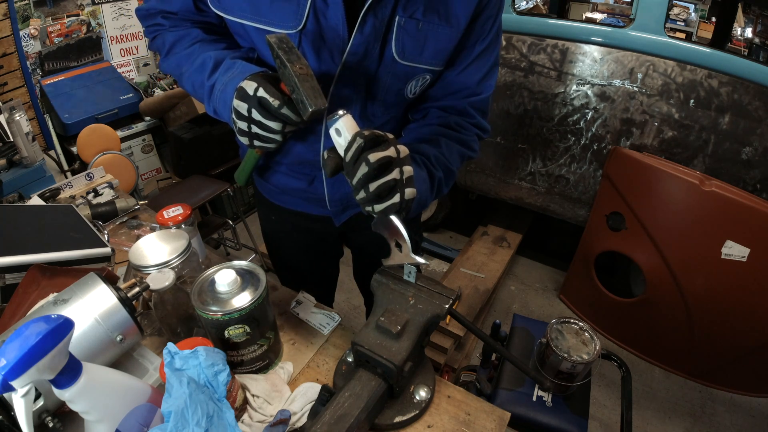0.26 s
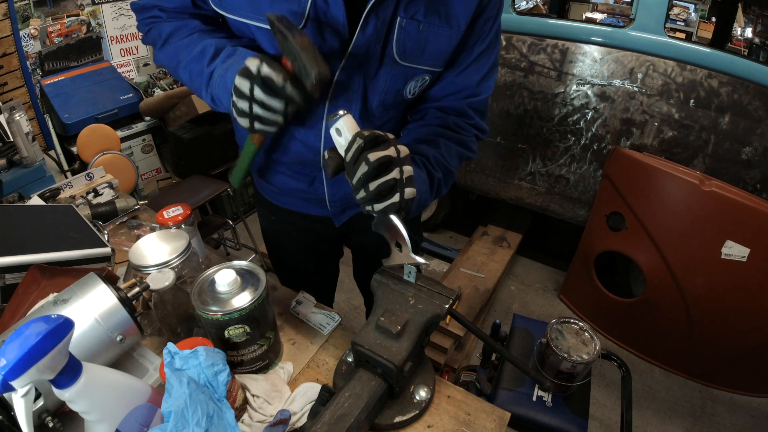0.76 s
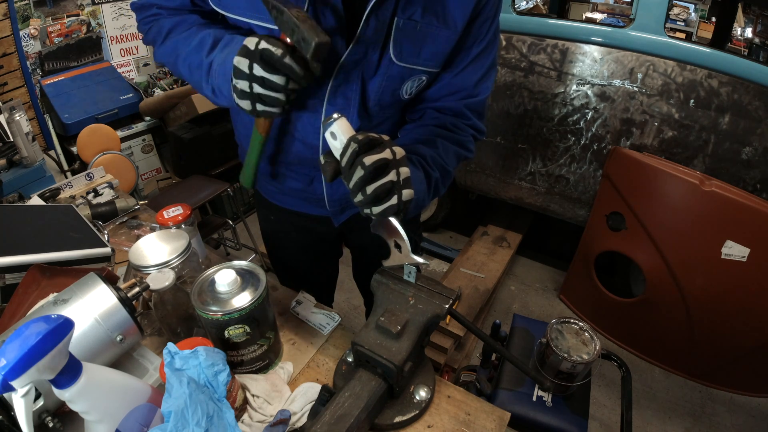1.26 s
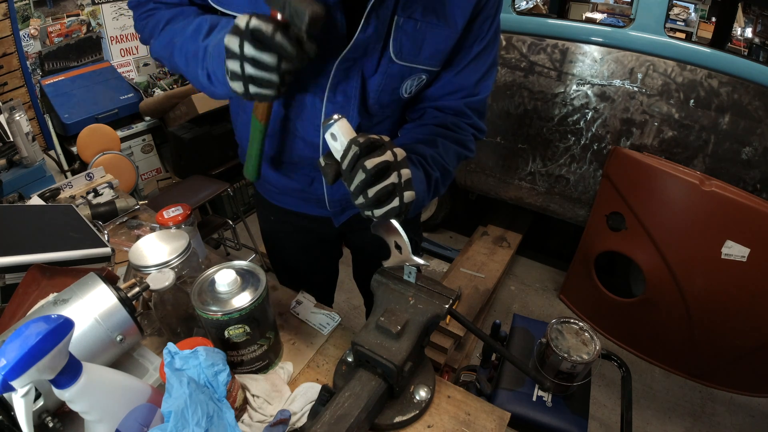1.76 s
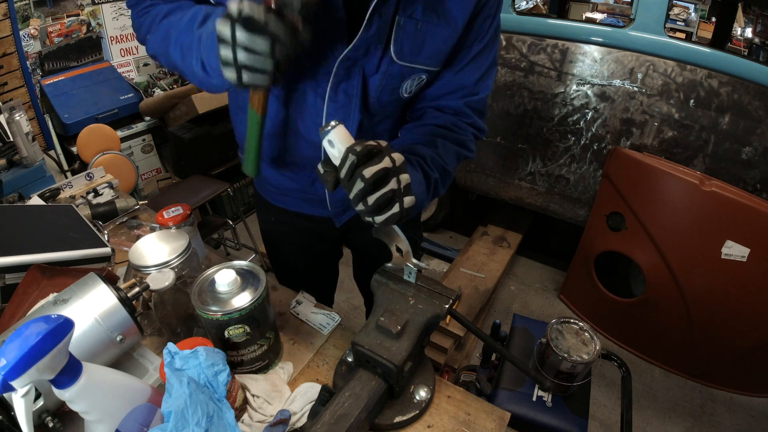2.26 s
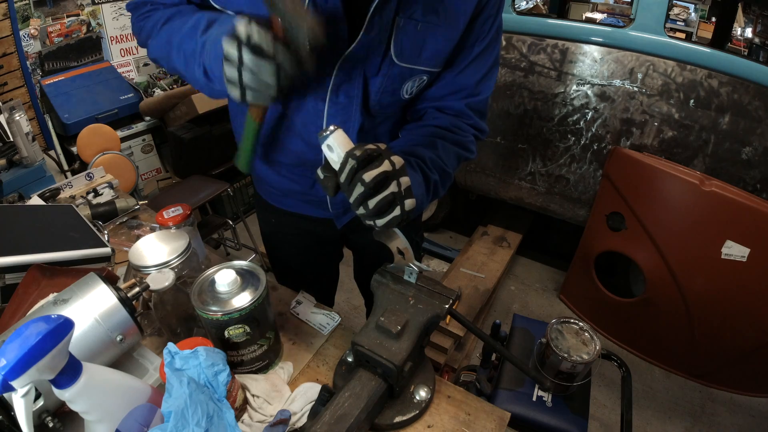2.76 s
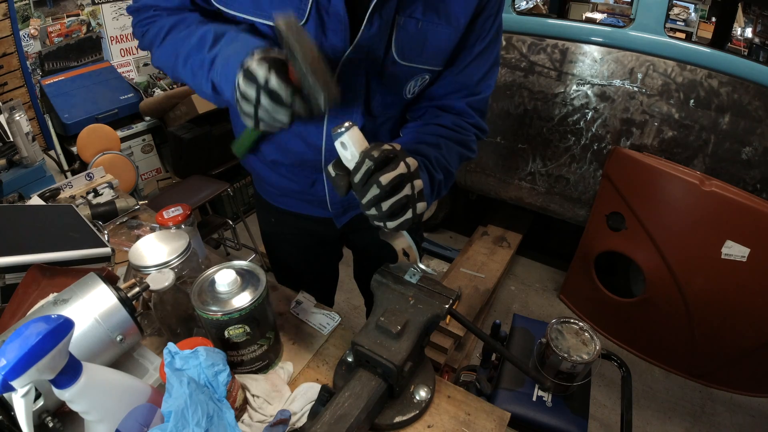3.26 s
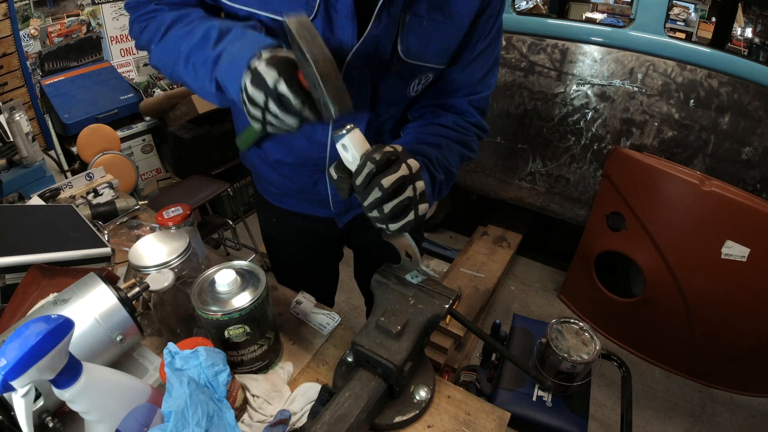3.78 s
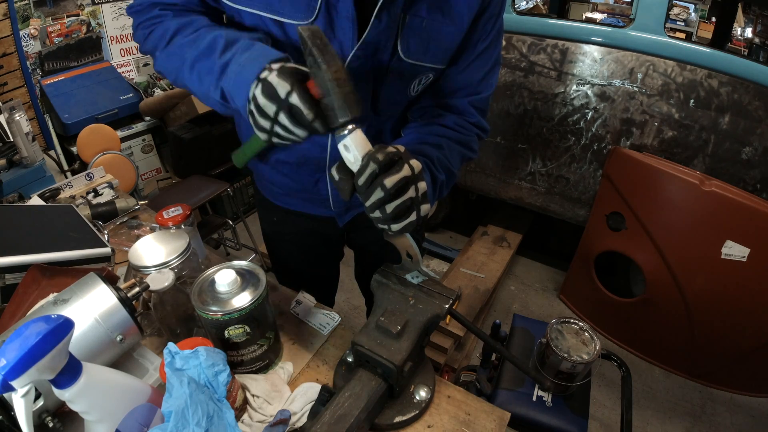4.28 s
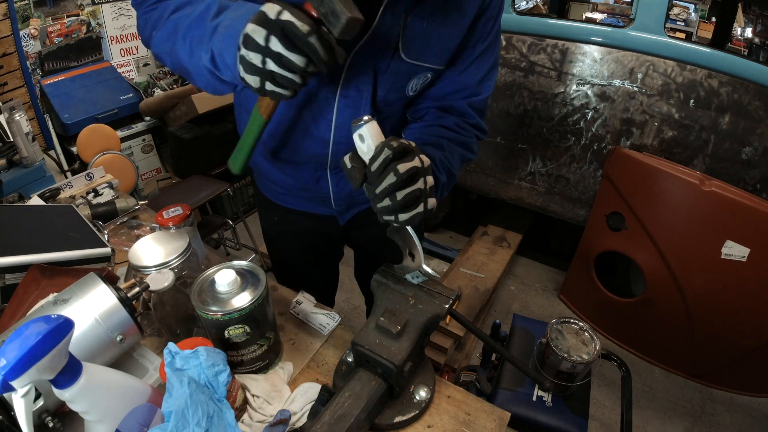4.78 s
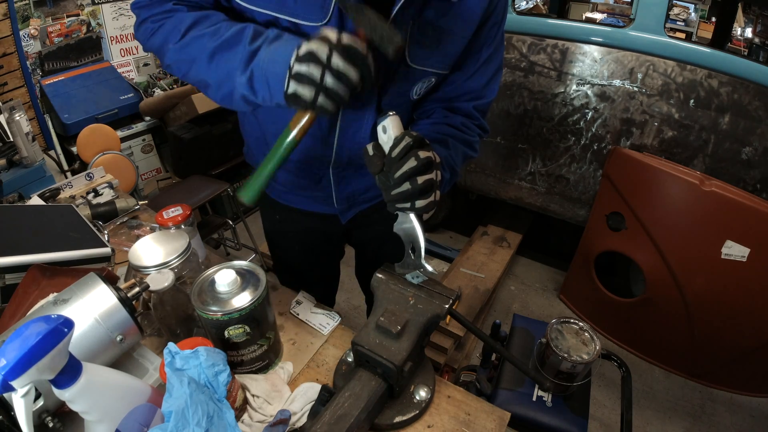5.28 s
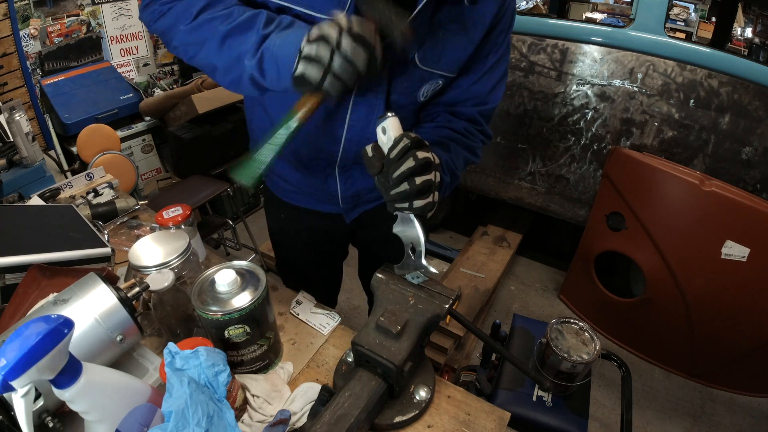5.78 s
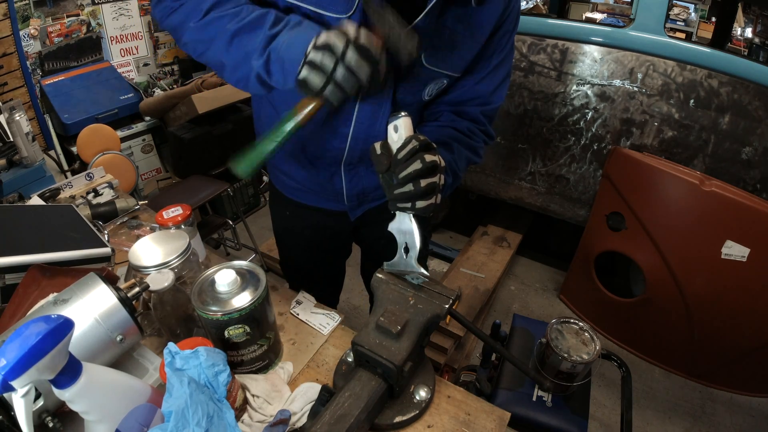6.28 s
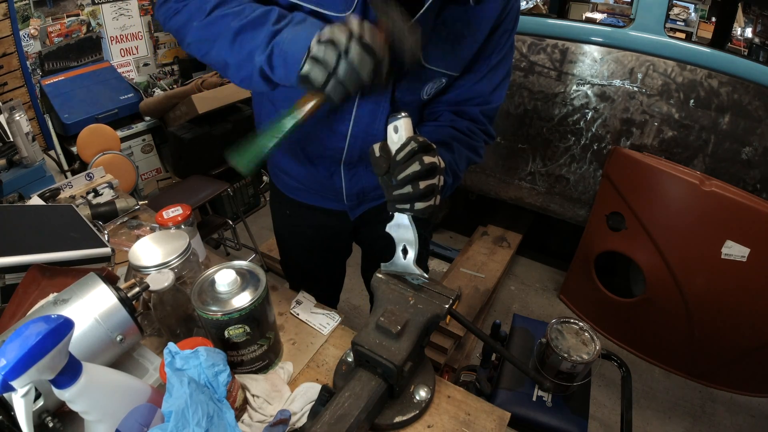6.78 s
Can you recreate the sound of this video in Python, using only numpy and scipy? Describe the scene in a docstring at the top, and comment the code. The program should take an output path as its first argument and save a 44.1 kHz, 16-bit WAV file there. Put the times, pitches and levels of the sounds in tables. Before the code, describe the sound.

Close, sharp hammer-on-chisel clanks, about four a second, booming through a bench, broken by a short metallic rattle before a lighter, looser final burst.

```python
"""Light taps of steel on steel over faint room air seat a chisel; then a hammer drives it into clamped sheet metal.
Each blow is a dead steel clank of damped modes with a tearing edge of noise, heard close up.
Then the bench booms and rings, and the workshop answers with noise that dies band by band.
Part way, loose metal clatters in runs of tiny strikes; the hammering resumes with the chisel broken through."""
import sys
import numpy as np
from scipy import signal
from scipy.fft import rfft, irfft
from scipy.io import wavfile

SR = 44100
rng = np.random.default_rng(int(sys.argv[2]) if len(sys.argv) > 2 else 0)


def transcribe(signal):
    """Save signal, clipped to [-1, 1], as a 16-bit WAV file at the path in sys.argv[1]."""
    frames = np.atleast_2d(signal).T
    limited = np.clip(frames, -1, 1)
    pcm = np.round(limited * 32767).astype(np.int16)
    wavfile.write(sys.argv[1], SR, pcm)


N = 310464
SIZE = 32768  # samples in one sound event
T = np.arange(SIZE) / SR
HZ = np.fft.rfftfreq(SIZE, 1 / SR)

# Long rings of bench and vise. Each row: frequency in Hz, level in dB, t60 in seconds,
# change in dB once the chisel has broken through.
BENCH_RINGS = [(87.15, -39.5, 0.54, -1.5), (94, -45.5, 1.3, -3), (119.1, -35.5, 0.45, 0),
               (151.2, -34, .22, 5), (198.3, -24, 0.15, 5), (230.8, -19.5, 0.16, -1),
               (230.2, -46.5, 1.3, -0.5), (276, -34.5, 0.54, 0), (349.7, -27.5, .3, -5),
               (345, -46.5, 1.2, 2.5), (392, -45, 0.8, -3), (449.5, -45, 0.97, -4), (503, -38, 0.42, -16),
               (628, -38.5, 0.2, 9), (734, -35.5, 0.21, 3.5), (797, -39, 0.16, 13), (910, -46.5, 0.59, -1),
               (1030, -39, 0.095, 0), (1186, -33, 0.24, 2.5), (1375, -44, 0.2, 4), (1637, -38, .22, -0.5),
               (1846, -37.5, 0.21, 4), (2840, -42, 0.17, -4), (3910, -47.5, 0.12, 0),
               (2590, -38.5, 0.23, -4), (3180, -45.5, 0.2, 7.5)]


def amp(db):
    """Decibels as an amplitude factor."""
    return 10 ** (np.asarray(db) / 20)


def read(points, hz=HZ):
    """A curve of (Hz, value) points joined by straight lines over log frequency."""
    f, value = np.transpose(points)
    return np.interp(np.log(hz + 1), np.log(f + 1), value)


def add(mix, start_s, sound):
    """Lay a sound into the mix, cut off at the end of the scene."""
    part = mix[:, round(start_s * SR):][:, :SIZE]
    part += sound[..., :part.shape[1]]


def colour(x, points):
    """Causal minimum-phase filter with the given (Hz, dB) shape."""
    log_gain = np.log(amp(read(points)))
    both_sides = np.concatenate([log_gain, log_gain[-2:0:-1]])
    response = np.exp(np.conj(signal.hilbert(both_sides)))[:len(HZ)]
    return irfft(rfft(x) * response)


def unit(x):
    """Scale to a total energy of one."""
    return x / np.sqrt(np.sum(x ** 2) + 1e-20)


def convolve(a, b):
    """Circular convolution of two sounds of the same length."""
    return irfft(rfft(a) * rfft(b))


def pair(length):
    """White noise at two closely spaced microphone ports: alike in the bass, mostly unrelated in the treble."""
    # Each row: frequency in Hz, left-right likeness from 0 to 1.
    likeness = [(100, 0.94), (400, 0.96), (1000, 0.96), (2700, 0.11), (3400, 0.45), (4200, 0),
                (16000, 0.075)]
    alike = np.clip(read(likeness, np.fft.rfftfreq(length, 1 / SR)), -1, 1)
    mid, side = rfft(rng.standard_normal((2, length)))
    common = np.sqrt((1 + alike) / 2) * mid
    opposed = np.sqrt((1 - alike) / 2) * np.array([side, -side])
    return irfft(common + opposed, length)


def ring(modes, pitch, lag, uneven_db, apart_hz=4500):
    """Damped modes at both ports; each strike starts them at slightly uneven times and levels."""
    hz, width, db = np.transpose(modes)[:, :, None]
    t = np.maximum(T[:SIZE // 8] - lag * rng.random(hz.shape), 0)
    uneven = uneven_db * rng.standard_normal(hz.shape)
    height = amp(db + uneven) * 2 * np.pi * width / SR  # the level is that of the spectral peak
    skew = hz / apart_hz * rng.standard_normal(hz.shape) / 2  # short waves reach the ports out of step
    envelope = height * np.exp(-np.pi * width * t) * (1 - np.exp(-4 * hz * t))
    phase = 2 * np.pi * hz * pitch * t
    sound = (envelope * np.cos(phase + np.array([skew, -skew]))).sum(1)
    return np.pad(sound, ((0, 0), (0, SIZE - sound.shape[1])))


def room_tone():
    """The faint steady air of the workshop: noise shaped to a spectrum."""
    # Each row: frequency in Hz, level in dB.
    air = [(20, -28.5), (45, -36.5), (90, -55), (200, -65.5), (750, -65), (1500, -68), (3500, -71),
           (5000, -75), (9000, -99), (16000, -104)]
    gain = amp(read(air, np.fft.rfftfreq(N, 1 / SR)))
    return irfft(rfft(pair(N)) * gain, N)


def room_bands(early_db=4, early_share=0.91):
    """Each band's filter and envelope: dense early echoes off the bench, then the slower room."""
    # The workshop. Each row: frequency in Hz, t60 in seconds, build-up in seconds.
    workshop = [(60, 0.87, 0.004), (200, 0.43, 0.0039), (507, 0.39, 0.0011), (990, 0.49, 0.00087),
                (2400, 0.42, 0.0099), (3940, 0.34, 0.004), (7000, 0.29, .001), (13900, 0.21, 0.002)]
    centres = np.array(workshop)[:, 0]
    bands = []
    for weights, (_, t60, rise) in zip(np.eye(len(workshop)), workshop):
        late_power = amp(-120 * T / t60)
        early_power = amp(2 * (early_db - 60 * T / (t60 * early_share)))
        build_up = 1 - np.exp(-(T / rise) ** 2)
        envelope = unit(np.sqrt(late_power + early_power) * build_up)
        bands.append((read(np.column_stack([centres, weights])), envelope))
    return bands


def tail(noise, bands):
    """Noise dying band by band: a room response of about unit energy per port."""
    spectrum = rfft(noise)
    return sum(irfft(spectrum * weights) * envelope for weights, envelope in bands)


def seating(bands, knock_room_db=-3, tick_room_db=-4, knock_decay=0.013):
    """Light touches of steel on steel: one short noise burst coloured as knock, tick and ping."""
    # Each row: start in seconds, dull knock in dB, bright tick in dB, steel ping in dB.
    touches = [(.273, -21, -18.5, -29), (0.2954, -3, -39, -40), (0.519, -3, -21.5, -19),
               (.6, -11, -24.5, -16.5), (0.791, -20.5, -25, -12)]
    # The three colours. Each row: frequency in Hz, level in dB.
    dull_colour = [(50, -11.5), (220, -2.5), (700, -2.5), (1250, -1.5), (1600, -22), (3000, -64),
                   (6000, -58)]
    bright_colour = [(300, -17), (1500, -14), (2300, 4.5), (3100, -5.5), (3700, -11), (4800, -27),
                     (5500, -38), (9000, -58.5)]
    ping_colour = [(1000, -29), (3700, -9.5), (4300, -5), (4550, -33), (4900, -35), (9000, -41)]
    out = np.zeros((2, N))
    for start_s, knock_db, tick_db, ping_db in touches:
        room = tail(pair(SIZE), bands)
        touch = unit(rng.standard_normal(SIZE) * np.exp(-T / knock_decay))
        knock = touch + amp(knock_room_db) * room
        tick = touch + amp(tick_room_db) * room
        add(out, start_s, amp(knock_db) * colour(knock, dull_colour))
        add(out, start_s, amp(tick_db) * colour(tick, bright_colour))
        add(out, start_s, amp(ping_db) * colour(tick, ping_colour))
    return out


def clank(pitch, through, rebound=0.41, rebound_s=.0016, echo=0.19, slap=0.31, slap_s=.0037):
    """The chisel is struck and kicks back; once cut, the loose sheet slaps it; things close by echo it."""
    # The gripped chisel and the sheet under it. Each row: frequency in Hz, width in Hz, level in dB,
    # change in dB once the chisel has broken through.
    chisel_modes = [(201, 100, 15.5, 6.5), (526.5, 57, 22.5, -6.5), (1076, 240, 19, 4.5),
                    (1226, 170, 19, 1), (1628, 37, 16.5, -10), (1934, 360, 20.5, -4), (2588, 215, 21, -1),
                    (2900, 30, 10.5, 6), (3100, 44, 6.5, -4), (3250, 120, 16.5, -3.5), (3420, 250, 11, 3.5),
                    (3760, 33, 5.5, -7), (4200, 33, 0.5, -19.5), (5270, 50, 3, 1), (6300, 40, 3, -3),
                    (9600, 700, -4.5, 5)]
    hz, width, db, change_db = np.transpose(chisel_modes)
    modes = np.column_stack([hz, width, db + through * change_db])
    strike = ring(modes, pitch, lag=0.00041, uneven_db=1.4)
    kick = ring(modes, pitch, lag=0.00037, uneven_db=1.5)
    sound = strike + rebound * np.roll(kick, round(rebound_s * SR), axis=1)
    sound = sound + through * slap * np.roll(kick, round(slap_s * SR), axis=1)
    for k, delay_s in enumerate(np.sort(rng.uniform(.004, .02, 5))):
        level = echo / np.sqrt(k + 1) * rng.choice([-1, 1])
        sound = sound + level * np.roll(strike, round(delay_s * SR), axis=1)
    return unit(sound)


def tearing_edge(grain, decay=0.0024, rise=0.00019):
    """The edge tears into the sheet: a very short burst of noise, strongest in the upper mids."""
    # Each row: frequency in Hz, level in dB.
    tear_colour = [(100, -19), (1000, 8), (3000, 11.5), (4300, 13.5), (5200, -3), (7000, 0), (9500, -3),
                   (11500, -3.5), (14500, 2.5), (16000, -1)]
    burst = unit(np.exp(-T / decay) * (1 - np.exp(-T / rise)))
    return colour(grain * burst, tear_colour)


def thrown_back(direct, delay_s=.016, echo_db=-15, dull_hz=1700):
    """A large surface nearby returns one dull echo of the clank."""
    dull = signal.sosfilt(signal.butter(1, dull_hz, fs=SR, output="sos"), direct)
    return amp(echo_db) * np.roll(dull, round(delay_s * SR), axis=1)


def clutter(count=90, t60_at_1khz=0.24, shorter=0.41):
    """Tins and tools on the bench each have a thin ring of their own, the higher ones shorter."""
    place = (np.arange(count) + rng.random(count)) / count
    hz = 700 * 22 ** place[:, None]  # 700 Hz to 15.4 kHz
    t60 = t60_at_1khz * (hz / 1000) ** -shorter
    rings = np.exp(-np.log(1000) * T / t60) * np.sin(2 * np.pi * hz * T)
    return rings * np.sqrt(hz / t60)


def boom(grain, bands, tins):
    """What the shaken bench sends into the room: the room's dying noise plus the tins and tools set ringing."""
    # Each row: frequency in Hz, level in dB.
    boom_colour = [(25, -12), (50, -5), (85, 24.5), (170, 17.5), (220, 25.5), (280, 26.5), (420, 23.5),
                   (540, 24.5), (780, 20.5), (1200, 13.5), (1650, 12), (2700, 8), (3900, 7), (4800, -0.8),
                   (6500, -5.5), (9500, -2.5), (11500, -8), (15500, -7)]
    shared = rng.standard_normal(len(tins))
    per_port = .5 * rng.standard_normal((2, len(tins)))
    shaken = unit((shared + per_port) @ tins)
    return colour(tail(grain, bands) + shaken, boom_colour)


def bench_rings(delay=0.005, rise=0.002):
    """The blow travels down through the vise and rings the bench a moment later: one wave per mode."""
    hz, db, t60, _ = np.transpose(BENCH_RINGS)[:, :, None]
    t = np.maximum(T - delay, 0)
    wave = np.sin(2 * np.pi * (hz * t + rng.random(hz.shape)))
    return amp(db - 60 * t / t60) * wave * (1 - np.exp(-t / rise))


def bench(rings, through, uneven_db=1.5):
    """A blow shares its energy among the bench's rings a little differently each time."""
    change_db = np.array(BENCH_RINGS)[:, 3]
    uneven = uneven_db * rng.standard_normal(len(BENCH_RINGS))
    return amp(through * change_db + uneven) @ rings


def thump(noise, delay=.006, decay=.016):
    """The bench top heaves under the vise: a compact low push just after the clank."""
    # The bench top. Each row: frequency in Hz, level in dB.
    heave_colour = [(40, -20), (90, 8.5), (140, 23), (175, 20), (225, 28.5), (330, 18.5), (550, 23.5),
                    (900, 16), (1400, 6), (3000, -11), (8000, -35.5)]
    t = np.maximum(T - delay, 0)
    push = unit(np.exp(-t / decay) * (1 - np.exp(-t / 0.00071)))
    return colour(noise[:, ::-1] * push, heave_colour)  # reversed, so its grain is not the edge's


def blow_tone(start_s, push_db, tear_db, aim):
    """How push, tearing, aim and the chisel's lean colour one blow: (Hz, dB)."""
    # A firm push deepens the blow. Each row: frequency in Hz, dB per dB of push.
    push_tilt = [(85, 0.22), (200, 0.92), (620, .5), (1150, 0.27), (1850, 0)]
    # Tearing adds sizzle. Each row: frequency in Hz, dB per dB of tearing.
    tear_tilt = [(3800, 0), (7000, 1)]
    # A square hit favours the chisel's main ring. Each row: frequency in Hz, change in dB.
    square_tone = [(1150, 0), (1850, -3), (2550, 4), (3800, -2), (7000, 0)]
    # The tone once the chisel stands upright. Each row: frequency in Hz, change in dB.
    upright_tone = [(100, 1), (400, -3), (750, 2.5), (1150, 4), (1850, -2), (2550, -1), (6000, -1.5),
                    (9500, 1.5), (13000, -1)]
    # The hand raises the chisel between these two times in seconds.
    raised_s = [5.85, 6.1]
    upright = np.interp(start_s, raised_s, [0, 1])
    db = push_db * read(push_tilt) + tear_db * read(tear_tilt)
    db = db + aim * read(square_tone) + upright * read(upright_tone)
    return np.column_stack([HZ, db])


def hammering(bands, repeat=0.74, clank_db=14.0, edge_db=-1.13, boom_db=-2.0, bench_db=0, thump_db=-.8,
              handover=.25, break_s=5, chisel_hz=2580):
    """Clank and edge come straight to the microphone; a firmer push sends more into bench and room instead."""
    # Each row: start in seconds, force in dB, push into the bench in dB, tearing in dB,
    # aim from -1 glancing to 1 square, chisel pitch in Hz.
    blows = [(0.835, -10, 10.5, -2, -.45, 2580), (1.0936, -5, 7.5, -4.5, -0.11, 2570),
             (1.3812, -1, 2.5, -5, -0.21, 2690), (1.6465, -0.9, 2.5, -1, -0.3, 2390),
             (1.9122, -2, 3.5, -1.3, -0.1, 2457), (2.1734, -0.6, -2.5, -0.8, -0.15, 2464),
             (2.4389, -2.5, 1, 3.2, 0.7, 2620), (2.7025, -1.9, 4.5, 2, -0.035, 2580),
             (2.966, 0, 0.9, 1.5, 0.0009, 2580), (3.2466, 3, -3, -3.6, -0.26, 2477),
             (3.5124, 1.3, -3.5, -4, 0.45, 2576), (3.7866, 2.5, .4, 0.3, 0.57, 2496),
             (4.0503, 2.5, 2, 1, 0.81, 2604), (4.3135, 4, 1.2, 1.5, -.85, 2576),
             (4.5462, 2.5, 1.5, 2.7, -.6, 2574), (5.3736, -4, -4, -3, -0.61, 2606),
             (5.617, -2.2, 0, 1.3, 0.54, 2626), (5.8568, -2.1, -2.1, 1.8, 0.18, 2444),
             (6.0941, -5, -2.5, 4.5, 0.89, 2474), (6.3533, -6, -2, 4, -0.3, 2630),
             (6.6075, -2, -6.5, 1.5, .75, 2610), (6.8475, -2, -6, 5, 1, 2530)]
    out = np.zeros((2, N))
    paths, rings, tins = pair(SIZE), bench_rings(), clutter()  # the same paths and things answer every blow
    repeat = np.clip(repeat, 0, 1)
    for start_s, force_db, push_db, tear_db, aim, hz in blows:
        through = start_s > break_s
        grain = repeat * paths + np.sqrt(1 - repeat ** 2) * pair(SIZE)
        direct = amp(clank_db) * clank(hz / chisel_hz, through)
        direct = direct + amp(edge_db) * tearing_edge(grain)
        answer = amp(boom_db) * boom(grain, bands, tins)
        answer = answer + amp(bench_db) * bench(rings, through)
        answer = answer + amp(thump_db) * thump(grain)
        near = (direct + thrown_back(direct)) * amp(-handover * push_db)
        blow = near + answer * amp(handover * push_db)
        add(out, start_s, amp(force_db) * colour(blow, blow_tone(start_s, push_db, tear_db, aim)))
    return out


def contact_tone(length, typical_s=.012):
    """Short contacts knock, long ones slide and hiss: (Hz, dB)."""
    doublings = np.log2(length / typical_s)
    body_db = .5 - 1.5 * doublings
    hiss_db = -4.5 + 5 * doublings
    return [(650, body_db), (1100, 0.0031), (7000, hiss_db)]


def clatter(bands, chatter_per_s=900, room_db=-6, scrape_db=-1, ring_db=-9, bench_db=-35):
    """Loose steel chatters on the vise: quick runs of tiny strikes ring the sheet and nudge the bench."""
    # Each row: start in seconds, level in dB, length in seconds.
    contacts = [(4.6, 20, 0.022), (4.655, 20.5, 0.012), (4.668, 21, 0.014), (4.729, 10, 0.015),
                (4.7542, 25.5, 0.0071), (4.761, 23, .008), (4.836, 12, 0.0086), (4.846, 7, .007),
                (5.147, 1.5, 0.026), (5.184, -10, 0.036), (5.221, -3, 0.029)]
    # The loose metal's rings. Each row: frequency in Hz, width in Hz, level in dB.
    sheet_modes = [(414, 35, 5), (485, 31, -0.5), (656, 46, 9.5), (777, 19, -3.5), (950, 8, 5),
                   (1080, 16, 5), (1248, 70, 2.5), (1418, 34, 0.5), (1650, 69, 2), (2200, 200, -5.5),
                   (2610, 80, -5), (2750, 140, -10)]
    # Each row: frequency in Hz, level in dB.
    scrape_colour = [(50, -20.5), (200, -9.5), (450, 1.5), (750, -1), (1150, -6.5), (2200, -7.5),
                     (3800, -14), (5000, -17), (9000, -29), (15500, -36)]
    out, nudge = np.zeros((2, N)), bench(bench_rings(), through=False)
    for start_s, db, length in contacts:
        hits = rng.random(SIZE) < chatter_per_s / SR
        strikes = pair(SIZE) * (hits + 0.16)  # a little steady rubbing between the strikes
        strikes = np.sqrt(2) * unit(strikes * np.exp(-(T / length) ** 2))
        rings = unit(convolve(strikes, ring(sheet_modes, 1, lag=0.0018, uneven_db=3)))
        room = tail(pair(SIZE), bands)
        scrape = colour(amp(scrape_db) * strikes + amp(room_db) * room, scrape_colour)
        contact = colour(amp(ring_db) * rings + scrape, contact_tone(length))
        add(out, start_s, amp(db) * (contact + amp(bench_db) * nudge))
    return out


def scene():
    """Room air, seating taps, hammer blows and clatter, all in one workshop."""
    bands = room_bands()
    return room_tone() + seating(bands) + hammering(bands) + clatter(bands)


def record(dry, ceiling=0.94, low_cut_hz=58, edge_hz=15900):
    """The left port leads slightly; the hardest peaks are rounded off; then the low cut and the band limit."""
    # Each row: frequency in Hz, radians by which the left port leads.
    port_lead = [(0, 0.061), (300, 0.24), (650, .35), (2700, 0.26), (3400, 0.044), (16000, 0.096)]
    lead = np.interp(np.fft.rfftfreq(N, 1 / SR), *np.transpose(port_lead))
    ports = irfft(rfft(dry) * np.exp(1j * np.array([lead, -lead]) / 2), N)
    rounded = ports / (1 + (ports / ceiling) ** 4) ** (1 / 4)
    low_cut = signal.butter(3, low_cut_hz, "high", fs=SR, output="sos")
    band_limit = signal.firwin(255, edge_hz, window=("kaiser", 8), fs=SR)
    return signal.oaconvolve(signal.sosfilt(low_cut, rounded), band_limit[None], "same")


dry = scene()
out = record(dry)
transcribe(out)
```